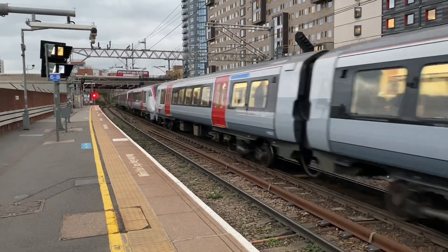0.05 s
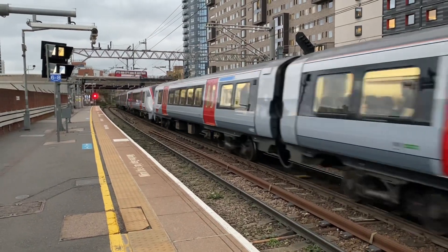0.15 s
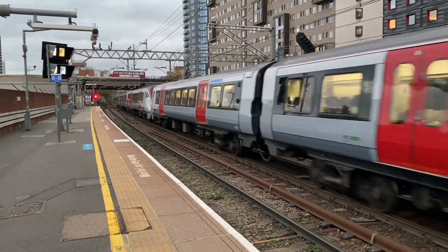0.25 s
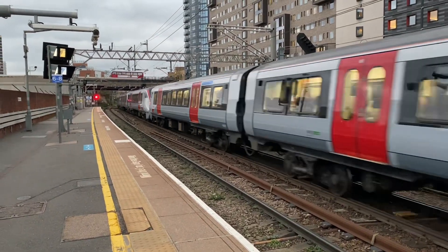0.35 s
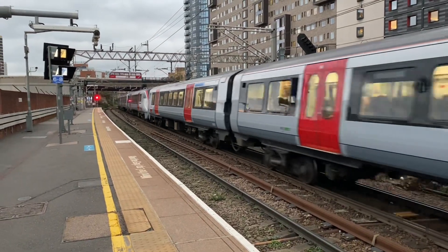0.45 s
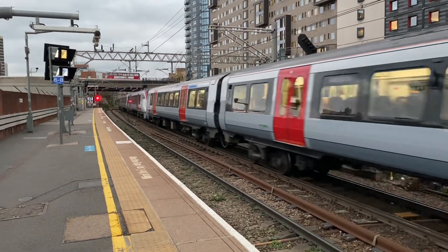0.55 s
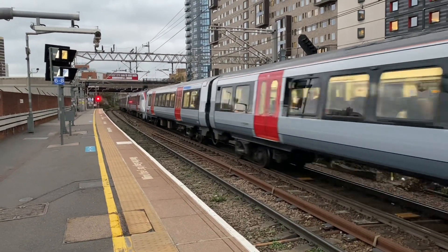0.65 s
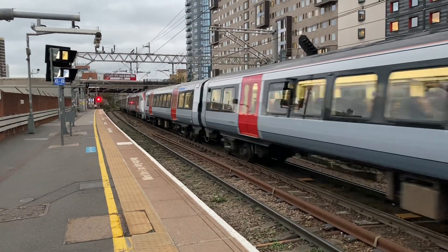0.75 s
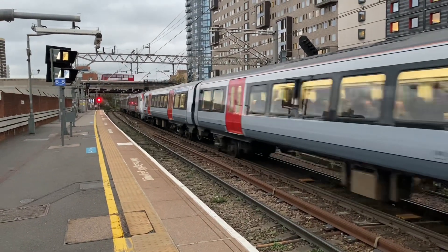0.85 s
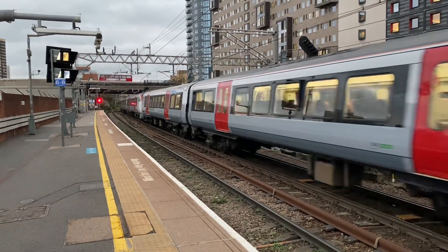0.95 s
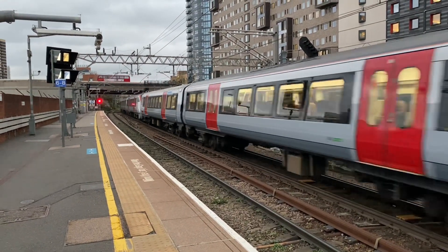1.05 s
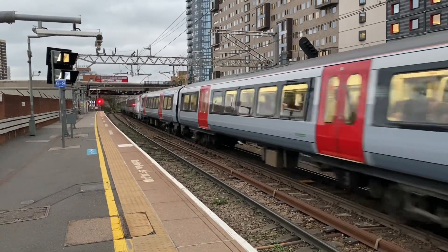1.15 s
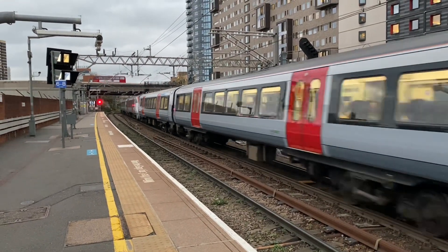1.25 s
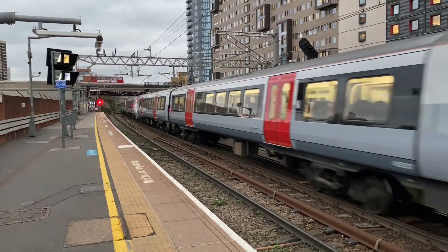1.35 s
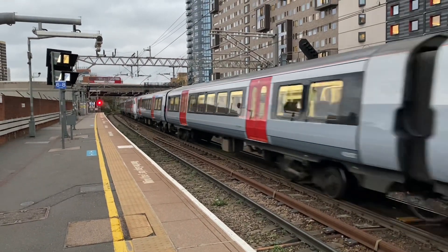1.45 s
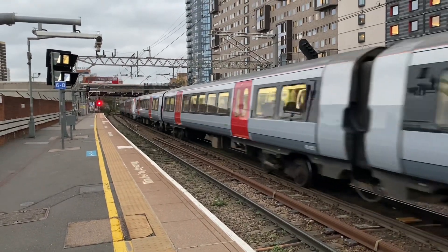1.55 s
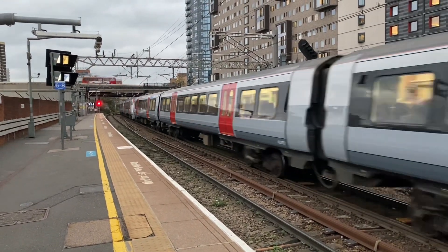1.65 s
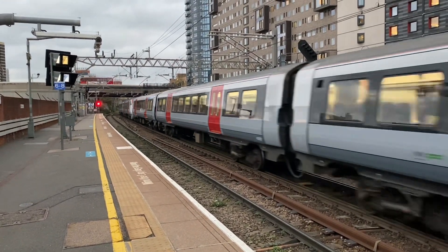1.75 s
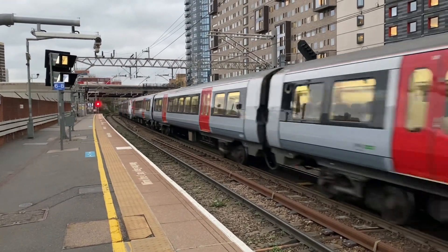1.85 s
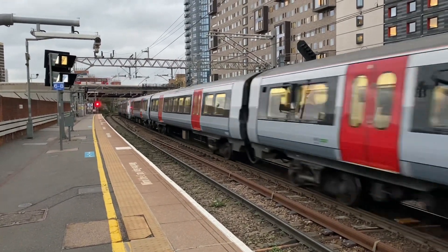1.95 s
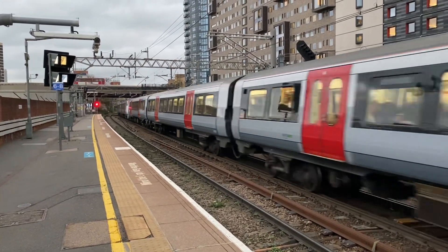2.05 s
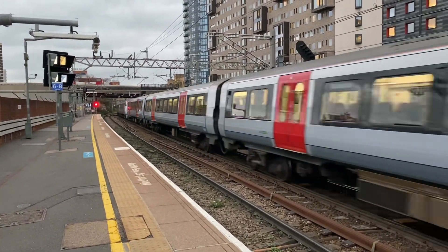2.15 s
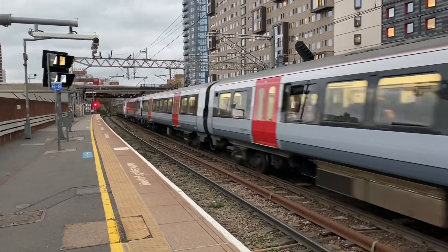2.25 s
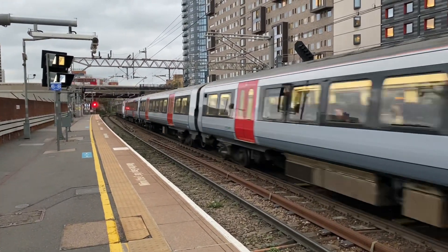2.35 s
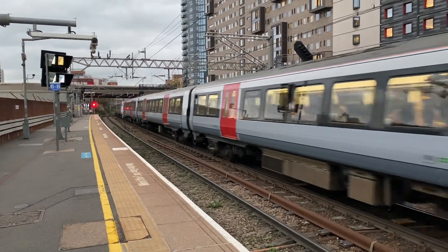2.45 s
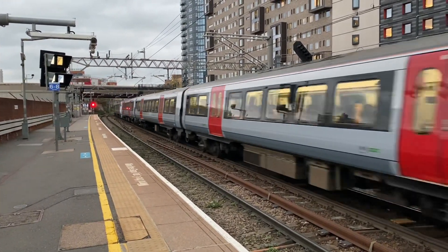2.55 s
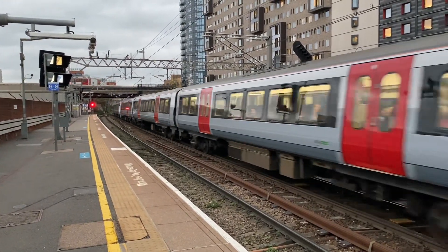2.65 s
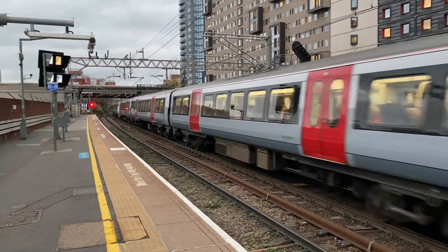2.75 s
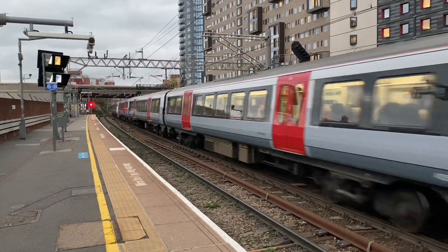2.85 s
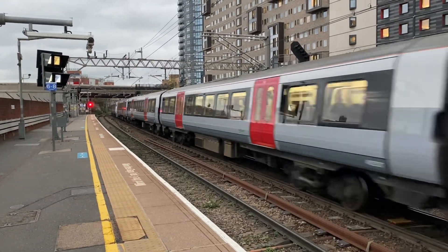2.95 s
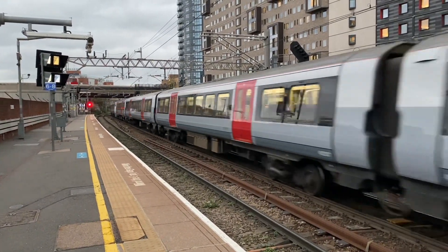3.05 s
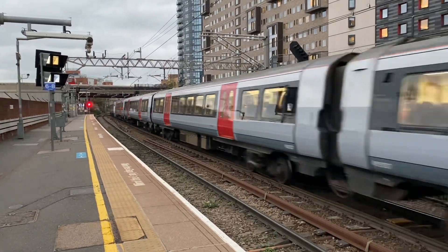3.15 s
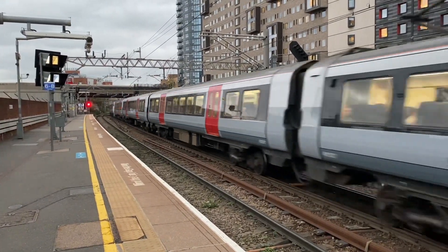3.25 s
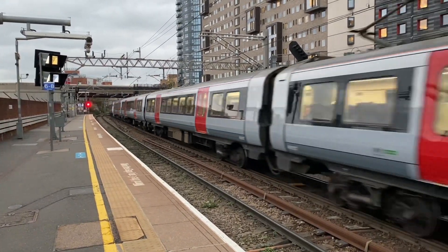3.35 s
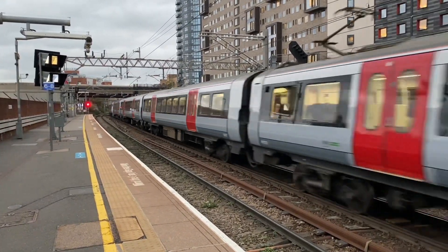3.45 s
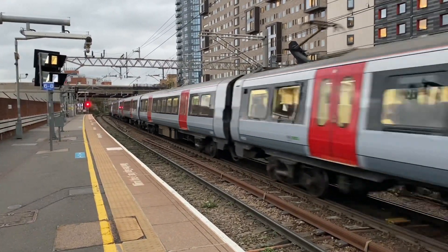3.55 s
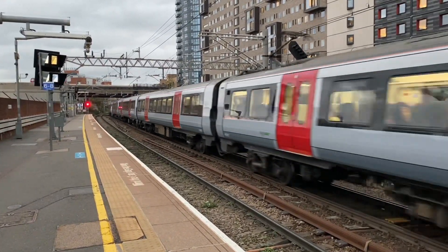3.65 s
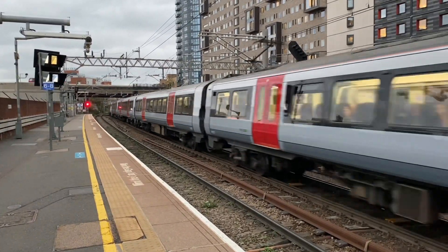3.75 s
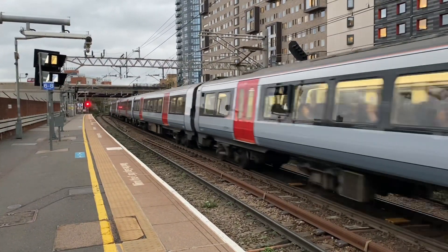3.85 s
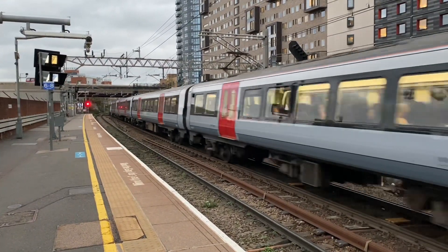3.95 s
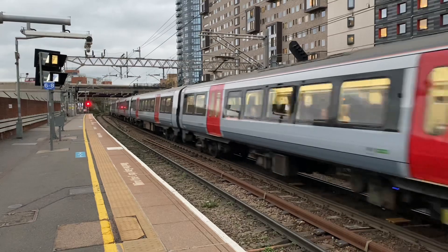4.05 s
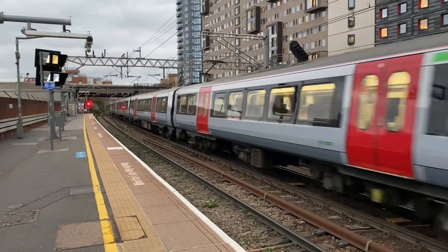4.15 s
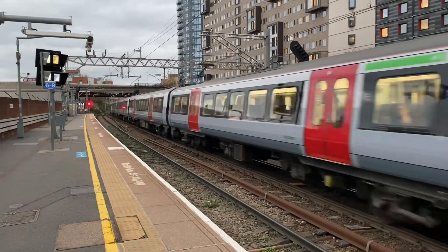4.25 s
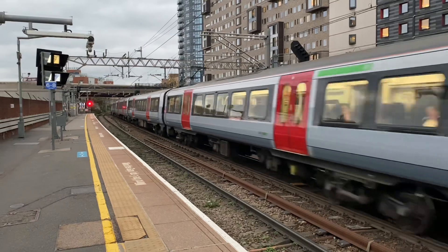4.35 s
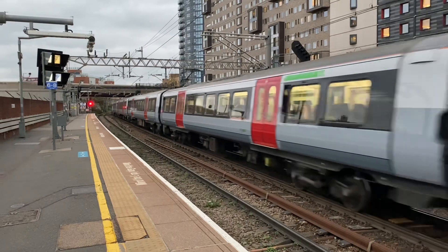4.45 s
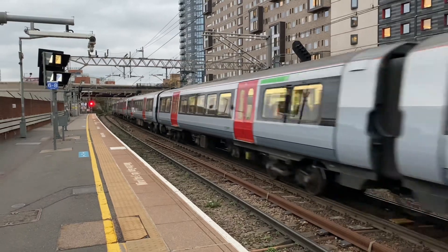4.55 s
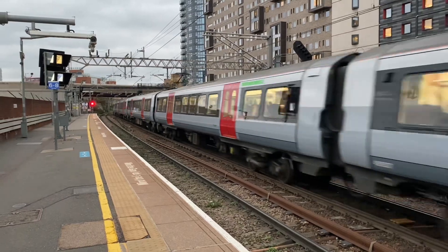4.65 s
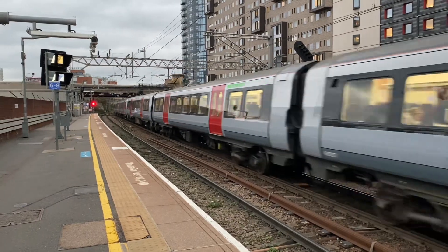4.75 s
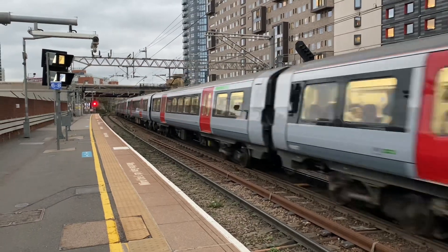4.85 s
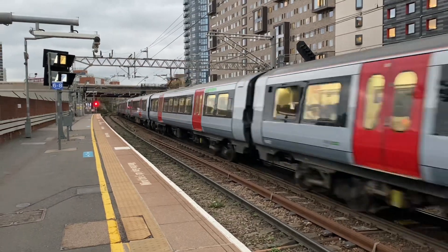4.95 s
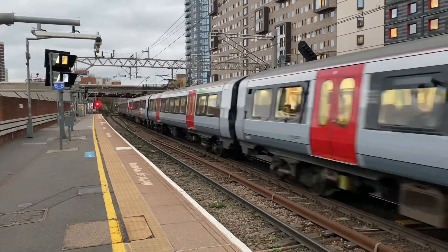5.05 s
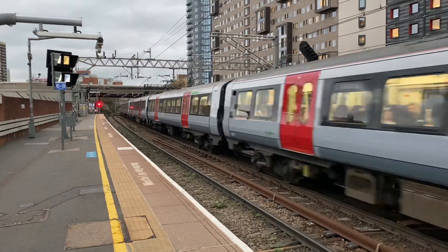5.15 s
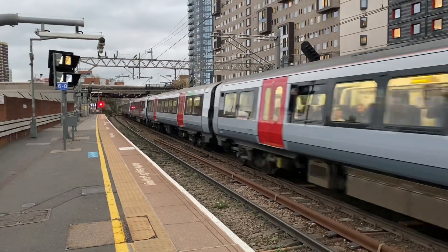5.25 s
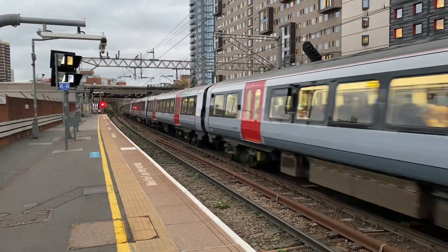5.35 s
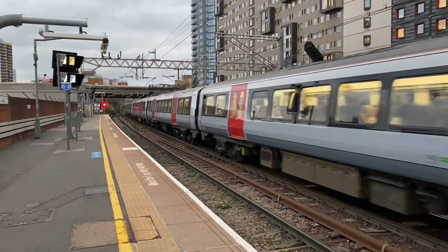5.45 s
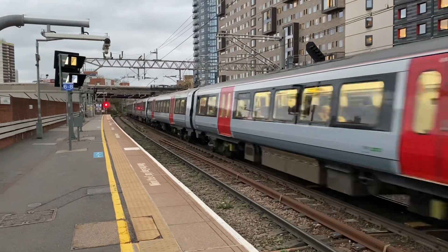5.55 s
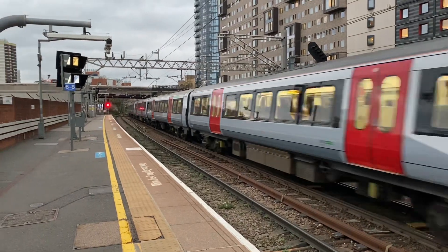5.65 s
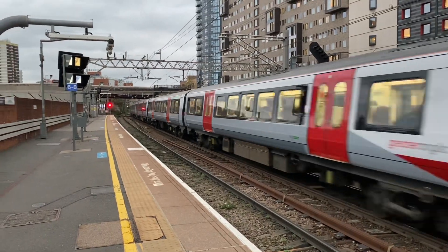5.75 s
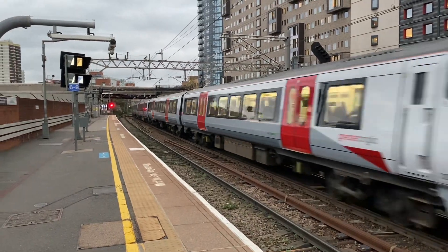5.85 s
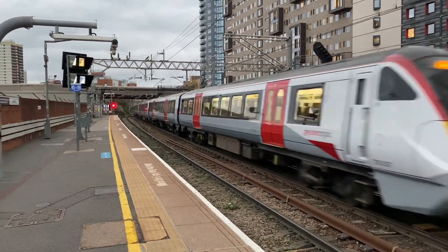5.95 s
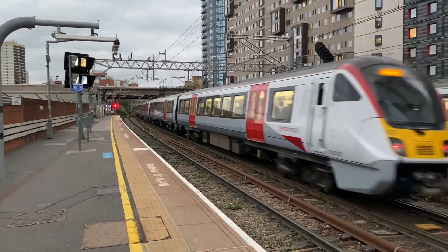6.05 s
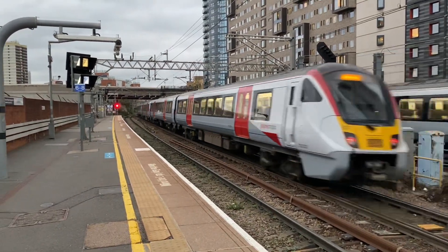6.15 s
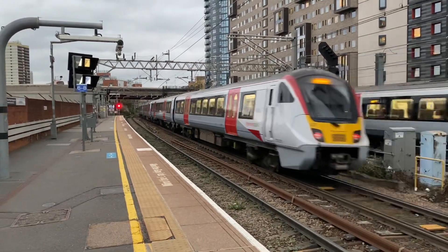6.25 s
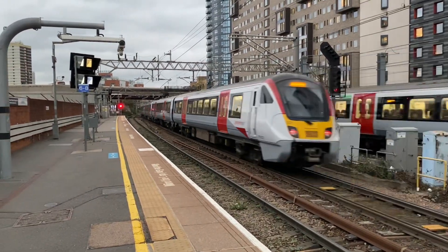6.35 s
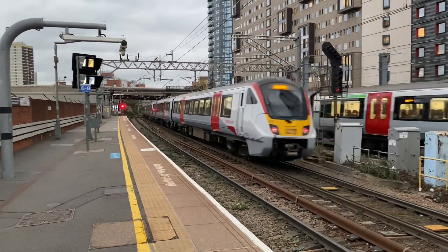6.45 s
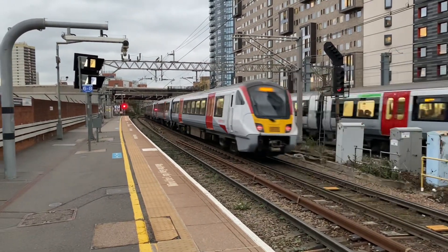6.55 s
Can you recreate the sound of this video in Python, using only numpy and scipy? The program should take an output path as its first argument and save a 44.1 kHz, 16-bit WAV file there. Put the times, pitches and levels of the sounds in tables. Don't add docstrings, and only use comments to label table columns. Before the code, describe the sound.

On an open station platform, an electric train runs past close on the right. A low-mid rolling roar swells abruptly with each pair of bogies and sinks between them, with dull knocks over rail joints. Deep gusts boom into the hand-held phone. Thin gear whine and faint metallic singing sit underneath; near the end the wind eases as the last car leaves.

```python
import sys
import numpy as np
from scipy import signal
from scipy.fft import rfft, irfft, next_fast_len
from scipy.io import wavfile
from scipy.ndimage import uniform_filter1d, map_coordinates

SR = 44100
rng = np.random.default_rng(int(sys.argv[2]) if len(sys.argv) > 2 else 0)


def natural_amplitude(level_db):
    exponent = np.asarray(level_db, float) / 20
    return 10 ** exponent


def materialize(psi):
    bounded = np.clip(np.atleast_2d(psi).T, -1, 1)
    quanta = np.round(bounded * 32767).astype(np.int16)
    wavfile.write(sys.argv[1], SR, quanta)


N = 291485

# [t/s, level/dB]
SLIPSTREAM = [
    (0.0, -25.5),
    (1.0, -21.5),
    (1.2, -24.5),
    (1.5, -23),
    (4.55, -24),
    (4.75, -31),
    (5.4, -41),
    (5.9, -32),
    (6.61, -37),
]
# [t/s, level over the lull/dB, half length/s]
GUSTS = [(0, 9, 0.034), (.19, 4.5, 0.098), (.33, 9, 0.054), (.57, 4, 0.15), (.8, -2, 0.082),
         (.95, -6, 0.082), (1.5, -2, 0.2), (1.82, 4, 0.11), (2.03, 3, .07), (2.18, -7, 0.055),
         (2.52, 4.5, 0.085), (2.84, 1.5, 0.039), (3.05, -2, .08), (3.32, 6, 0.24), (3.7, 3, 0.055),
         (4.05, 2, 0.14), (4.36, 9, 0.12), (4.6, 9, 0.077), (4.86, 10.5, 0.052), (5.2, 13, 0.039),
         (5.31, 5, 0.036), (5.46, 13, 0.051), (5.6, 11, 0.041), (5.76, 1, 0.078), (5.94, 3, 0.19),
         (6.38, 7, 0.031), (6.52, 14, 0.072)]
# [t of peak/s, level/dB, f/Hz]
EDDIES = [(0.01, -11, 113), (0.138, -12, 176), (0.157, -11, 109), (0.189, -11, 135), (0.301, -13, 95),
          (0.489, -8, 158), (0.519, -12, 105), (0.571, -9, 72), (0.68, -12, 150), (0.763, -10, 105),
          (0.811, -11, 117), (0.939, -10, 96), (1.128, -13, 92), (1.303, -13, 126), (1.436, -12, 92),
          (1.575, -12, 102), (1.778, -8, 168), (1.802, -11, 100), (1.863, -12, 96), (1.912, -11, 108),
          (2.153, -11, 95), (2.181, -10, 88), (2.483, -12, 105), (2.81, -13, 131), (2.829, -11, 96),
          (2.955, -12, 141), (3.015, -10, 108), (3.057, -10, 73), (3.13, -10, 101), (3.304, -8, 92),
          (3.365, -8, 132), (3.489, -9, 110), (3.662, -12, 106), (3.694, -9, 137), (3.714, -10, 93),
          (3.918, -13, 125), (4.036, -13, 105), (4.089, -12, 135), (4.132, -9, 142), (4.192, -12, 127),
          (4.229, -11, 99), (4.305, -10, 128), (4.37, -11, 85), (4.445, -7, 145), (4.568, -11, 124),
          (4.601, -7, 121), (4.658, -11, 146), (4.819, -16, 166), (4.857, -17, 116), (5.182, -16, 156),
          (5.309, -17, 124), (5.446, -19, 138), (5.566, -19, 178), (5.708, -19, 115), (5.777, -18, 169),
          (5.795, -16, 149), (5.915, -15, 121), (5.971, -16, 104), (6.38, -18, 173), (6.526, -16, 140)]
# [t of peak/s, level/dB, f/Hz]
SLAMS = [
    (.335, -2.5, 106),
    (4.343, -4, 125),
]
# [f/Hz, level/dB per Hz]
BUFFET = [(20, -38), (35, -15.5), (60, -0.5), (100, -5), (200, -9), (350, -18), (700, -75)]

# [t/s, level/dB]
TRAIN = [(0, 0), (.08, -0.5), (.25, 0.5), (.8, -2), (1.6, 1.1), (2.3, 0), (2.9, 1), (4.6, 1.5), (5.15, 1.5),
         (5.3, -1), (5.9, 0.5), (6.05, -2.5), (6.61, -2.5)]
# [t of start/s, level/dB, hold/s]
BOGIES = [(0.136, -14, 0.25), (0.415, -17, 0.1), (0.737, -14, 0.29), (1.255, -23, 0.18),
          (1.788, -12.5, 0.29), (2.36, -12.5, 0.25), (2.78, -22, 0.27), (3.357, -13.5, 0.18),
          (3.88, -14.5, 0.22), (4.305, -21, 0.16), (4.565, -16, 0.037), (4.886, -15.5, 0.21),
          (5.383, -18, 0.25), (5.537, -33, 0.24), (6.415, -29, 0.13)]
# [t/s, reduction/dB, half length/s]
LULLS = [(1.05, -4, .06), (1.68, 6.5, 0.072), (2.2, -4, 0.033), (2.68, 3, 0.05), (3.13, 4.5, 0.083),
         (3.57, -3, 0.026), (3.8, -7, 0.094), (5.13, -5, .03), (6.1, 3, 0.13), (1.42, -3, 0.054),
         (4.245, 5, .04), (5.75, 0, .04), (5.95, -1, .05), (6.2, -3, .08), (5.3, -8, .06)]
# [t of peak/s, level/dB, f/Hz, left minus right/dB]
JOINTS = [(0.007, -6, 353, 0), (0.15, -14, 366, -2), (0.192, -10, 402, -8), (0.216, -14, 420, -5),
          (0.44, -10, 420, -8), (0.489, -8, 334, 1), (0.753, -11, 414, -9), (0.793, -14, 399, -7),
          (0.838, -14, 445, -5), (0.912, -12, 407, -6), (0.997, -13, 426, -6), (1.297, -15, 385, 0),
          (1.368, -13, 373, -1), (1.777, -10, 337, -2), (1.853, -14, 336, -5), (1.908, -12, 414, -5),
          (2.063, -13, 411, -9), (2.084, -10, 359, -7), (2.357, -11, 402, -8), (2.376, -14, 464, -5),
          (2.434, -12, 395, -9), (3.382, -14, 369, -5), (3.405, -11, 333, -5), (3.452, -12, 419, -9),
          (3.69, -14, 307, -3), (3.888, -14, 366, -7), (3.962, -11, 440, -9), (4.049, -10, 368, -3),
          (4.074, -12, 338, 0), (4.131, -12, 311, -1), (4.209, -10, 350, 0), (4.311, -13, 389, -1),
          (4.335, -10, 342, 1), (4.444, -13, 384, -1), (4.576, -8, 384, -2), (4.846, -15, 414, 1),
          (4.903, -15, 466, -3), (4.964, -8, 419, -6), (5.104, -13, 392, -4), (5.186, -14, 350, -5),
          (5.56, -14, 360, -3), (5.612, -14, 425, 1), (5.688, -12, 312, 1), (5.774, -15, 308, 2),
          (5.808, -17, 381, 0), (5.91, -16, 370, 0), (5.957, -16, 428, 1), (6.381, -18, 454, -1),
          (6.476, -18, 404, -2), (6.522, -17, 374, 0)]
# [t of peak/s, level/dB, f/Hz, left minus right/dB]
MORE_KNOCKS = [
    (1.886, -16, 423, 0),
    (2.045, -17, 402, 0),
    (2.405, -15, 430, -11),
    (0.245, -16, 423, -5),
    (5.029, -12, 560, -7),
    (5.32, -21, 400, -2.5),
]
# [f/Hz, level/dB per Hz]
ROAR = [(120, -3.5), (220, -3), (320, 1), (450, -0.5), (600, -0.5), (800, -6.5), (1100, -30)]
NEAR = [(150, -16), (260, -7), (360, -2), (450, 0.5), (580, -9), (750, -9), (1100, -23)]
RAIL = [(500, -28), (800, 4.5), (1000, -1), (1250, -3), (1700, -8.5), (2400, -9), (3500, -22), (4500, -30)]

# [t/s, level/dB, half length/s]
WHINE = [(.4, -27.5, .04), (2.75, -34, 0.46), (4.6, -33.5, 0.62), (.98, -24.5, .07), (1.13, -19, 0.064),
         (1.25, -20, 0.062), (1.54, -20.5, 0.032), (1.72, -33, .25), (1.65, -18.5, 0.017),
         (1.75, -23.5, 0.047), (1.91, -18.5, 0.077), (2.06, -27, .04), (2.2, -27.5, .05),
         (2.42, -21.5, 0.041), (2.57, -26, .04), (2.77, -29.5, 0.12), (3.1, -26.5, 0.044),
         (3.26, -25, 0.041), (3.42, -25.5, 0.049), (3.52, -33, 0.043), (3.79, -36, 0.05), (4.1, -30, .05),
         (4.25, -23, 0.058), (4.37, -26.5, 0.031), (4.46, -29, .04), (4.68, -32, .07), (4.82, -24.5, 0.047),
         (5.08, -28, 0.098), (5.4, -36, 0.14), (5.62, -35, 0.096), (5.8, -32, .05), (6.12, -28.5, 0.12),
         (6.45, -35.5, 0.3)]
# [t/s, level/dB, half length/s]
UPPER = [(.15, -36, 0.34), (.8, -36.5, .3), (1.5, -35, 0.58), (2.02, -26, 0.052), (2.4, -33, 0.56),
         (3.16, -27.5, 0.032), (3.45, -34.5, 0.2), (3.9, -36, 0.095), (4.1, -32, .08), (4.6, -33, 0.43),
         (5.5, -37, 0.29)]
# [t/s, line f/Hz, web ring f/Hz, unsteadiness/Hz]
GEARS = [(0, 772, 1420, 12), (.9, 762, 1420, 16), (1.05, 775, 1410, 14), (1.12, 755, 1400, 5),
         (1.3, 754, 1400, 5), (1.5, 768, 1380, 6), (1.97, 760, 1345, 5), (2.05, 800, 1335, 15),
         (2.6, 793, 1380, 14), (3.0, 788, 1390, 10), (3.3, 783, 1390, 8), (3.45, 855, 1390, 18),
         (3.95, 845, 1410, 18), (4.05, 840, 1040, 16), (4.2, 826, 1035, 6), (4.45, 842, 1035, 12),
         (4.82, 830, 1035, 6), (5.1, 848, 1035, 20), (5.4, 828, 1035, 15), (6.1, 840, 1035, 13),
         (6.61, 835, 1035, 14)]
# [t/s, phase by which left leads/rad]
WHINE_LAG = [(0, -2.6), (1.05, -2.5), (1.15, -2.1), (1.5, -2), (1.65, -1.1), (1.95, -1), (2.1, -2.2),
             (2.5, -2.5), (2.8, -1.2), (3.3, -1), (3.5, -2.9), (4.1, -2.7), (4.2, -1.5), (6.61, -1.5)]

# [t/s, level/dB, half length/s]
WHEELS = [
    [(.1, -37, 0.34), (1.0, -37, 0.46), (1.23, -36, 0.03), (1.9, -37.5, 1), (3.1, -39.5, 0.45),
     (4.02, -42, 0.097), (4.3, -34.5, 0.91), (5.05, -38, 0.12), (6.3, -37, 0.6)],
    [(.58, -46, .13), (.95, -35.5, 0.36), (1.6, -32.5, 0.57), (2.5, -33, 0.66), (3.6, -39, 1),
     (4.0, -45, 0.091), (4.8, -41.5, 0.34)],
    [(.55, -38, .12), (.9, -36.5, 0.32), (1.8, -37, 0.1), (1.45, -36, 0.43), (2.7, -33, 0.35),
     (3.42, -37.5, 0.13), (4.05, -32.5, 0.42), (4.7, -32.5, 0.37), (5.5, -40.5, 0.32)],
    [(.15, -48, .15), (1.05, -40, .15), (1.5, -39.5, .2), (1.85, -42, .1), (2.65, -39.5, 0.17),
     (3.2, -40, .2), (4.2, -39.5, .2), (4.65, -38, 0.27), (5.1, -47, .12), (5.8, -47, .2)],
    [(.25, -45, .08), (.76, -44, 0.13), (1.27, -46, 0.11), (2.4, -44, .1), (2.85, -46, .05), (3.1, -48, .1),
     (3.85, -49, .1), (4.02, -46, .04), (4.5, -42, 0.26), (5.4, -46, 0.16)],
]
# [f/Hz, width/Hz, level/dB, left minus right/dB]
RINGS = [(2068, 740, -1.5, 2), (2803, 610, 1.5, 2.5), (3055, 650, -1, 0.5), (3820, 480, -2.5, 4),
         (4830, 650, 0.5, 2)]
QUIET_RING_DB = [-39.5, -46.5, -42.5, -67, -68]

# [t/s, hiss level/dB, half length/s]
FLANGES = [(.02, -48, 0.13), (.21, -43, 0.1), (2.12, -66, .05), (0.856, -46.5, 0.11), (1.2, -50.5, 0.24),
           (1.32, -50, 0.16), (2.43, -50, 0.19), (2.98, -54, 0.05), (2.85, -56, .1), (1.78, -56, .04),
           (2.5, -57, .04), (3, -52, 0.053), (4.05, -45, 0.015), (4.0, -56, .12), (4.35, -54.5, 0.13),
           (5.03, -52, .06), (5.1, -50.5, 0.11), (6.5, -52, 0.029)]
# [f/Hz, level/dB per Hz]
GRIND = [(2500, -7), (3600, 0.5), (4300, -3.5), (4900, -3.5), (6500, -6), (7500, -13), (9500, -21),
         (11000, -28)]
HISS = [(5000, -0.5), (8000, 1), (10000, -4), (12000, -3), (14500, -8), (15700, -6)]

# [t/s, level/dB, f/Hz]
PINGS = [(1.01, -14, 1470), (1.216, -12, 1680), (1.367, -7.5, 1040), (2.798, -12, 1770), (2.943, -5, 1080),
         (4.31, -21, 1790), (4.45, -17, 1060), (4.925, -2, 560), (4.945, -4, 463), (5.086, -12, 1950),
         (6.357, -8.5, 753), (6.375, -10, 640), (2.04, -12, 666)]

# [f/Hz, phase by which left leads/rad]
LEAD = [(0, 0), (180, -.3), (450, -1.9), (750, -2.5), (1300, -3.1), (2000, -5.7), (4000, -6), (5800, -7.6),
        (6600, -6.2)]
# [from f/Hz, to f/Hz]
FLIPS = [(7500, 8700), (9500, 10000), (11600, 12700), (13800, 14500)]
# [f/Hz, likeness/0..1]
ALIKE = [(200, 0.15), (1200, 0.6), (1800, 0.26), (2600, 0.77), (4000, 0.34), (4800, 0.54), (6200, 0.11),
         (7200, 0.89)]
ALIKE_HIGH = [(8000, .7), (8800, .9), (9800, .75), (11000, .9), (12300, .8), (13000, .93), (16000, .93)]

TOP_HZ = 15780
PORT_LAG = 28
GIVE_WAY = 0.7
EDDY_DB, EDDY_CYCLES, JOINT_CYCLES = 0.8, 0.72, 1.4
EDDY_SHARP = 1.04
ROAR_DB, RAIL_DB, GRIND_DB, HISS_DB = -22.5, -28.5, -38.5, -54.5
HISS_GROWS, GRIND_SHARE = 0.9, 0.33
FAR_BOGIE_DB, BETWEEN_AXLES_DB = -29.5, -0.5
BOGIE_RISE_S, BOGIE_FALL_DB_PER_S = 0.0064, 133
IDLE_GEAR_DB, IDLE_UPPER_DB = -58, -40.5


def unit(x):
    return x / np.sqrt(np.mean(x ** 2) + 1e-20)


def along(points, hz):
    f, value = np.transpose(points)
    return np.interp(np.log(hz + 1), np.log(f + 1), value)


def colour(points):
    return lambda hz: natural_amplitude(along([(0.85, -120)] + points + [(SR / 2, -120)], hz))


def curves(rows):
    s, *columns = np.transpose(rows)
    return [np.interp(np.arange(N) / SR, s, column) for column in columns]


def wobble(rate):
    knots = rng.standard_normal(int(N * rate / SR) + 4)
    return map_coordinates(knots, [np.arange(N) * rate / SR])


def swells(rows, floor_db):
    s, db, half = np.transpose(rows)[:, :, None]
    t = np.arange(0, N + 256, 256) / SR
    bells = natural_amplitude(2 * db) * np.exp(-2 * ((t - s) / half) ** 2)
    power = natural_amplitude(2 * floor_db) + np.sum(bells, axis=0)
    return np.interp(np.arange(N) / SR, t, 10 * np.log10(power))


def sides(pan_db):
    return natural_amplitude(np.outer([.5, -.5], pan_db))


def filtered(x, response):
    m = next_fast_len(N + 8192)
    return irfft(rfft(x, m) * response(np.fft.rfftfreq(m, 1 / SR)), m)[..., :N]


def ports(pair, alike, gain):
    m = next_fast_len(N + 8192)
    hz = np.fft.rfftfreq(m, 1 / SR)
    turn = np.arccos(np.clip(along(alike, hz), 0, .999)) / 2
    mid, side = rfft(pair, m) * gain(hz) * (hz < TOP_HZ) * [np.cos(turn), np.sin(turn)]
    flips = sum(np.interp(hz, edge, [0, 1]) for edge in FLIPS)
    lead = np.interp(hz, *np.transpose(LEAD)) - np.pi * flips
    late = np.exp(.5j * np.outer([1, -1], lead))
    return unit(irfft(late * [mid + side, mid - side], m)[:, :N])


def rush(gain, patchy_db, alike=ALIKE + ALIKE_HIGH, size=(4, 10)):
    z = signal.stft(rng.standard_normal((2, N)), nperseg=512)[2]
    field = rng.standard_normal(z.shape[1:])
    field = uniform_filter1d(field, size=size[0], axis=0)
    field = uniform_filter1d(field, size=size[1], axis=1)
    pair = signal.istft(z * natural_amplitude(patchy_db * unit(field)), nperseg=512)[1][:, :N]
    return ports(pair, alike, gain)


def band(hz, width_hz):
    slow = filtered(rng.standard_normal((4, N)), lambda f: 1 / (1 + (2 * f / width_hz) ** 2))
    turn = 2 * np.pi * np.cumsum(hz) / SR
    return ports(slow[:2] * np.cos(turn) + slow[2:] * np.sin(turn), ALIKE, np.ones_like)


def thumps(rows, cycles, sag=0.28):
    reach = SR // 25
    sound = np.zeros((2, N + SR))
    u = np.arange(-reach, reach) / SR
    for (s, db, hz, pan_db), turn in zip(rows, rng.random(len(rows))):
        cycle = u * hz
        shape = np.exp(-(cycle / np.where(u < 0, .7 * cycles, cycles)) ** 2)
        sagging = (1 - np.exp(-sag * np.clip(cycle, -3, None))) / sag
        swing = shape * np.cos(2 * np.pi * (sagging + .35 + .3 * turn))
        left = np.roll(swing, PORT_LAG * (pan_db < -2.5))
        sound[:, round(s * SR):][:, :len(u)] += natural_amplitude(db) * sides(pan_db) * [left, swing]
    return sound[:, reach:][:, :N]


def between(rows, cycles):
    t = np.arange(0, N + 64, 64) / SR
    busy = sum(np.exp(-((t - row[0]) * row[2] / cycles) ** 2) for row in rows)
    return np.interp(np.arange(N) / SR, t, 1 - GIVE_WAY * np.clip(busy, 0, 1))


def slipstream():
    lumps = natural_amplitude(.8 * wobble(30) + 1.2 * np.array([wobble(14), wobble(14)]))
    buffet = unit(lumps * rush(colour(BUFFET), patchy_db=0.5, alike=[(40, 1.0), (200, 0.23)]))
    wind_db = curves(SLIPSTREAM)[0] - 1.5 + swells(GUSTS, floor_db=2.5)
    wind = natural_amplitude(wind_db) * between(EDDIES + SLAMS, 0.69) * buffet
    pans_db = rng.uniform(-3, 2, len(EDDIES))
    fronts = [(s, db, EDDY_SHARP * hz, pan_db) for (s, db, hz), pan_db in zip(EDDIES, pans_db)]
    eddies = natural_amplitude(EDDY_DB) * thumps(fronts, EDDY_CYCLES)
    slams = thumps([row + (0,) for row in SLAMS], cycles=1.73, sag=0.58)
    return wind + eddies + slams


def passes():
    start, db, hold = np.transpose(BOGIES)[:, :, None]
    t = np.arange(0, N + 64, 64) / SR
    u = t - start
    axles_db = BETWEEN_AXLES_DB * np.sin(np.pi * np.clip(u / hold, 0, 1)) ** 2
    fall_db = BOGIE_FALL_DB_PER_S * np.clip(u - hold, 0, None)
    gain = np.clip(1 + u / BOGIE_RISE_S, 0, 1) * natural_amplitude(db + axles_db - fall_db)
    power = natural_amplitude(2 * FAR_BOGIE_DB) + np.sum(gain ** 2, axis=0)
    return np.interp(np.arange(N) / SR, t, 10 * np.log10(power))


def bogies():
    train_db, near_db = curves(TRAIN)[0], passes()
    roar_db = ROAR_DB + train_db - swells(LULLS, floor_db=0) + 0.73 * wobble(9.2)
    rail_db = RAIL_DB + train_db + 0.5 * wobble(9)
    roar = natural_amplitude(roar_db - 1.0) * rush(colour(ROAR), patchy_db=3.0, alike=[(200, 0.59), (800, 0.073)])
    jolts = natural_amplitude(1.3 * wobble(35))
    near = unit(jolts * rush(colour(NEAR), patchy_db=0.94, alike=[(200, 0.94), (800, 1.0)]))
    near = natural_amplitude(near_db - 9.5) * sides(-9.0) * near
    rail_pan_db = 0.12 * (roar_db - near_db) - 3.0
    rail = natural_amplitude(rail_db) * sides(rail_pan_db) * rush(colour(RAIL), patchy_db=1.1)
    knocks = JOINTS + MORE_KNOCKS
    return between(knocks, 0.89) * (roar + near) + rail + thumps(knocks, JOINT_CYCLES)


def whine():
    line_hz, upper_hz, waver_hz = curves(GEARS)
    second = waver_hz / 24
    line = 0
    for share in (1, second):
        turn = 2 * np.pi * np.cumsum(line_hz + .8 * waver_hz * wobble(40)) / SR
        lag = curves(WHINE_LAG)[0] + (.15 + waver_hz / 20) * wobble(18)
        line = line + share * np.sin(turn + np.outer([.5, -.5], lag))
    flutter_db = 1.5 * np.array([wobble(25), wobble(25)])
    line_db = swells(WHINE, IDLE_GEAR_DB) + 2.5 + flutter_db
    line = natural_amplitude(line_db) * sides(-3.1) * line / np.hypot(1, second)
    upper = natural_amplitude(swells(UPPER, IDLE_UPPER_DB) - 1.5) * sides(-4.0) * band(upper_hz, width_hz=86)
    return line + upper


def wheels():
    sound = 0
    for spells, quiet_db, (hz, width_hz, db, pan_db) in zip(WHEELS, QUIET_RING_DB, RINGS):
        mode = lambda f: 1 / (1 + (2 * (f - hz) / width_hz) ** 2) ** 2.2
        ring = rush(mode, patchy_db=3.0, size=(1, 9))
        sound = sound + natural_amplitude(swells(spells, quiet_db) + db) * sides(pan_db) * ring
    return sound


def flanges():
    train_db, rub_db = curves(TRAIN)[0], swells(FLANGES, HISS_DB)
    grind_db = GRIND_DB + train_db + GRIND_SHARE * (rub_db - HISS_DB)
    hiss_db = rub_db + 4.5 + HISS_GROWS * train_db + 1.2 * wobble(22)
    grit = natural_amplitude(0.44 * wobble(60))
    grind = natural_amplitude(grind_db) * rush(colour(GRIND), patchy_db=2.5, size=(2, 5))
    hiss = natural_amplitude(hiss_db) * rush(colour(HISS), patchy_db=2.5, size=(12, 6))
    return grit * (grind + hiss)


def pings():
    sound = np.zeros(N + SR)
    u = np.arange(SR // 10) / SR
    for s, db, hz in PINGS:
        ring = np.sin(2 * np.pi * hz * u) + .4 * np.sin(2 * np.pi * .86 * hz * u)
        decay = natural_amplitude(db - 60 * u / 0.052)
        onset = 1 - np.exp(-u / 0.0069)
        sound[round(s * SR):][:len(u)] += decay * onset * ring
    return sides(-4) * [np.roll(sound, 17)[:N], sound[:N]]


def scene():
    return slipstream() + bogies() + whine() + wheels() + flanges() + pings()


def top_cut(x):
    return signal.sosfilt(signal.butter(12, 16900, fs=SR, output="sos"), x)


def record(dry):
    soft = dry / (1 + np.abs(dry / .95) ** 6) ** (1 / 6)
    mix = filtered(soft, lambda hz: hz < TOP_HZ)
    return top_cut(mix)


dry = scene()
out = record(dry)
materialize(out)
```